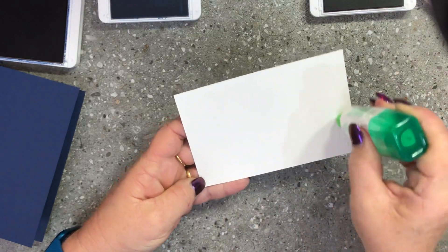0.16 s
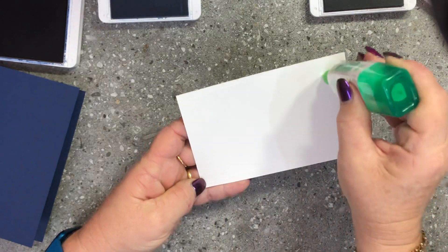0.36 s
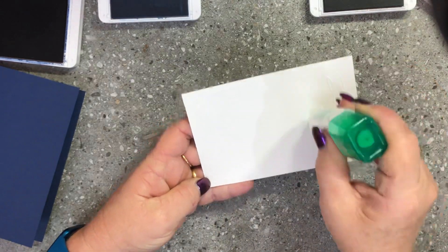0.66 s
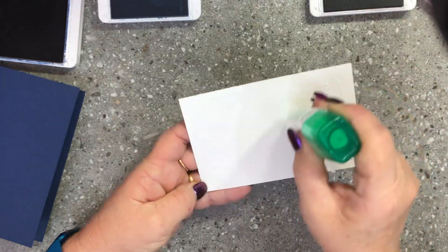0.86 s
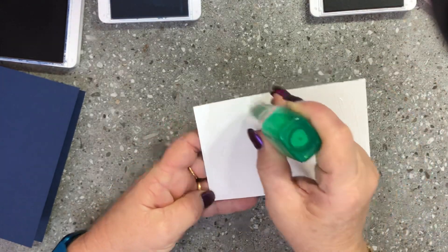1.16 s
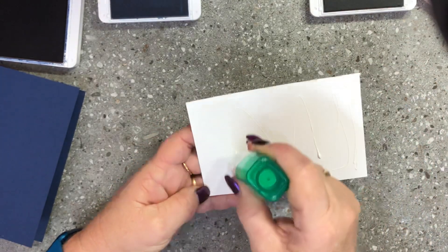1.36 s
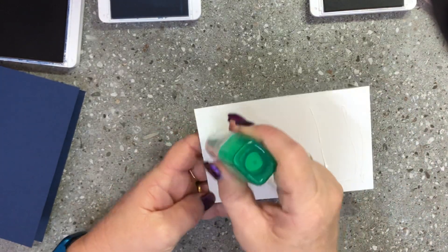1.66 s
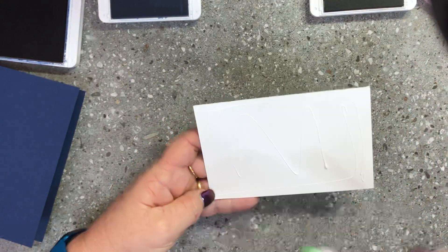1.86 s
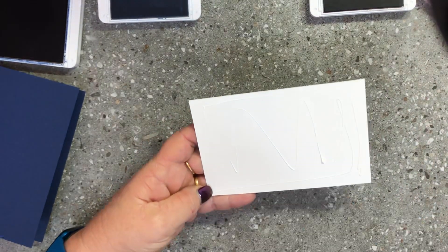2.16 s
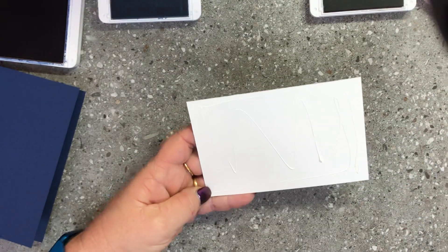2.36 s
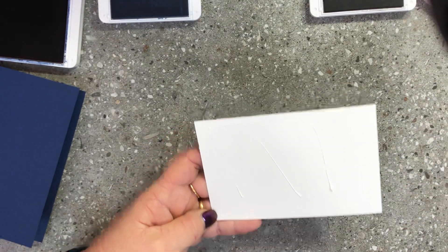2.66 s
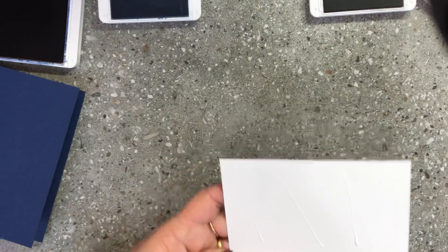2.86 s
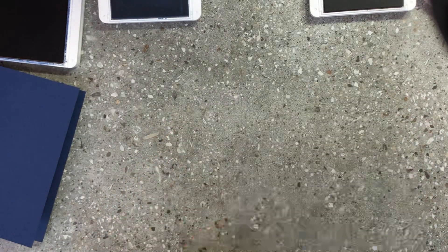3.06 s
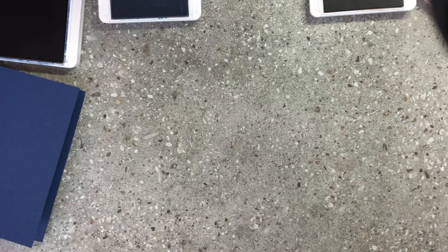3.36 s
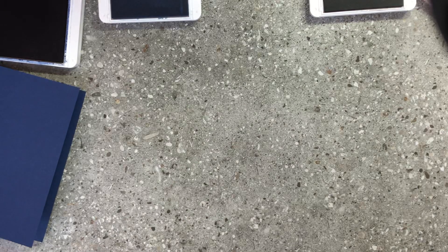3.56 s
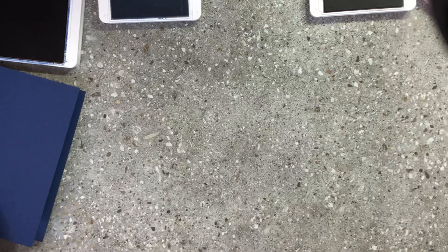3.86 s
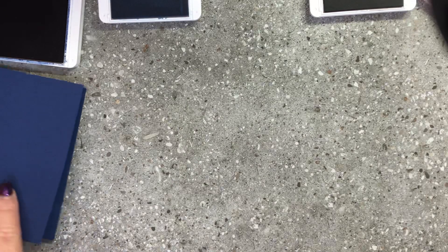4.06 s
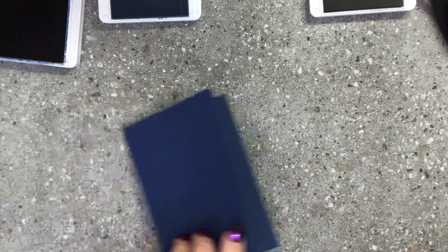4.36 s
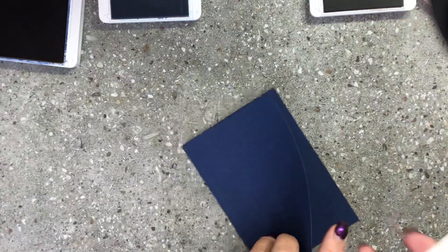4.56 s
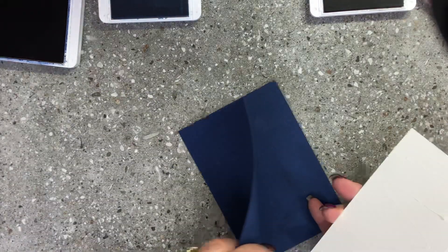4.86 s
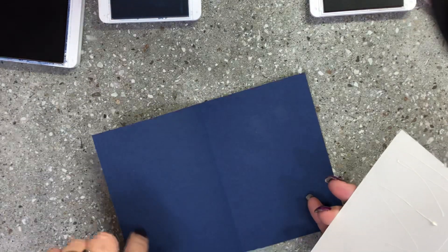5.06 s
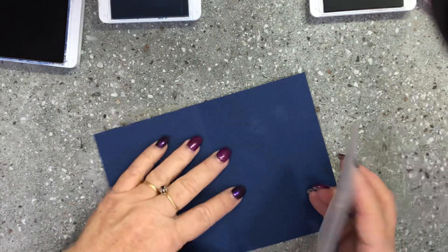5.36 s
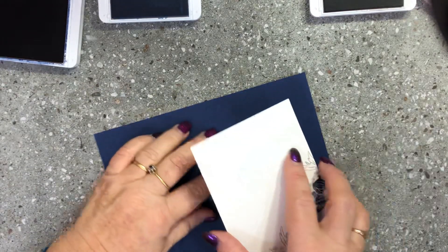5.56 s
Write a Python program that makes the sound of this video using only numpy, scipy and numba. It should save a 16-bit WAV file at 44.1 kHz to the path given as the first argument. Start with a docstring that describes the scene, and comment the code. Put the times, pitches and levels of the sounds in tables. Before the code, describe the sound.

Close dry zips of adhesive over stiff card, a hollow plastic set-down, a pause, then papery sliding, a sharp card snap and smoothing rubs.

```python
"""A tape runner lays adhesive on a hand-held card in short strokes, clicks, and is put down on a craft table.
A folded card is then slid across the table, flipped open with a snap and smoothed flat.
Strokes and rubs are dense random grains shaped by speed; snaps, clicks and the landing are struck pulses.
One close microphone above the table, in a small quiet room with low air noise."""
import sys
import numpy as np
from scipy import signal
from scipy.fft import rfft, irfft
from scipy.io import wavfile
from scipy.ndimage import uniform_filter1d
from numba import njit

SR = 44100
rng = np.random.default_rng(int(sys.argv[2]) if len(sys.argv) > 2 else 0)


def master(y):
    """Save y as 16-bit WAV."""
    cut = np.clip(np.atleast_2d(y).T, -1, 1)
    pcm = np.round(cut * 32767)  # scale
    wavfile.write(sys.argv[1], SR, pcm.astype(np.int16))


N = 251678
TIME = np.arange(N) / SR  # s

# strokes of the runner, levels relative: (middle [s], length [s], drumming of the card [dB],
# rasp of the tape [dB], fizz of the peeling adhesive [dB], card resonance at the middle [Hz])
STROKE_TABLE = [(.0, 0.24, -71, -62.5, -69, 1780), (0.258, 0.26, -57, -59.5, -60, 1640),
                (0.464, 0.14, -59.5, -64, -64.5, 1460), (0.958, .2, -60.5, -61, -83, 1560),
                (1.154, 0.25, -55, -59, -65.5, 1600), (1.379, .19, -55.5, -61.5, -70, 1264),
                (1.552, .17, -53, -67, -59.5, 1240), (1.717, 0.071, -65, -68.5, -61, 1560)]
# bright crack of a card edge, also the crackle of rubbed card: (frequency [Hz], relative level [dB])
EDGE_COLOUR = [(100, -47), (800, -20), (2500, 3.5), (4000, 7), (5500, 5.5), (8000, -1.5), (11000, -8.5),
               (16000, -3)]


def undb(db):
    """Decibels to gain."""
    return 10 ** (np.asarray(db) / 20)


def unit(x):
    """Scale to rms 1."""
    return x / np.sqrt(np.mean(x ** 2))


def through(x, response):
    """Pass a sound through an impulse response."""
    return signal.fftconvolve(x, response)[:len(x)]


def body(colour, size=4096):
    """Minimum-phase impulse response whose spectrum follows (Hz, dB) points."""
    hz, db = np.transpose(colour)
    bins = np.maximum(np.arange(size // 2 + 1) * SR / size, 1)
    level_db = np.interp(np.log(bins), np.log(hz), db)
    cepstrum = irfft(np.log(undb(level_db)))
    # folding the cepstrum forward makes the response causal
    cepstrum[1:size // 2] *= 2
    cepstrum[size // 2 + 1:] = 0
    return irfft(np.exp(rfft(cepstrum)))


def fade(t, t60):
    """Exponential decay, 60 dB down at t60 seconds."""
    return np.exp(-np.log(1000) * t / t60)


def walk(rate):
    """Random wander in straight segments, rate knots per second, with a spread near 1."""
    knots = rng.standard_normal(8192)
    return 1.2 * np.interp(TIME * rate, np.arange(len(knots)), knots)


def grains(rate, spread_db):
    """Tiny releases at random moments, rate per second, mostly weak and now and then strong; rms 1."""
    hits = rng.random(N) < rate / SR
    strength = np.minimum(rng.exponential(size=N), 5)
    sign = rng.choice([-1, 1], N)
    return unit(hits * sign * undb(spread_db * strength))


def blows(times, db):
    """One impulse for each event."""
    out = np.zeros(N)
    index = np.clip(np.round(times * SR).astype(int), 0, N - 1)
    np.add.at(out, index, undb(db))
    return out


def flutter(impulses, db, t60):
    """Dense rattling that dies away after each impulse; db is its energy against the impulse."""
    power = fade(TIME[:SR // 2], t60) ** 2
    envelope = np.sqrt(np.abs(through(impulses ** 2, power / power.sum())))
    return undb(db) * envelope * rng.standard_normal(N)


def knock(times, db, colour, flutter_db, flutter_t60, tail_db, tail_t60):
    """Contact pulses of peak level db; a thin wall flutters briefly after each and leaves a faint tail."""
    impulses = blows(times, db)
    pulse = body(colour)
    rattle = flutter(impulses, flutter_db, flutter_t60)
    tail = flutter(impulses, tail_db, tail_t60)
    return through(impulses + rattle + tail, pulse / np.abs(pulse).max())


@njit
def resonance(x, hz, width):
    """State-variable band-pass with a moving centre, gain 1 at the centre; hz and width in Hz."""
    y, band, low = np.empty(len(x)), 0., 0.
    for i in range(len(x)):
        g, k = np.tan(np.pi * hz[i] / SR), width / hz[i]
        v = (band + g * (x[i] - low)) / (1 + g * (g + k))
        band, low, y[i] = 2 * v - band, low + 2 * g * v, k * v
    return y


def moving_echo(x, delay, sway, db):
    """The bounce between card and table wanders in length as the hands move, so the colour shifts."""
    lag = delay * np.exp(sway * walk(5))  # s
    bounce = np.interp(TIME - lag, TIME, x)
    return (x + undb(db) * bounce) / np.hypot(1, undb(db))


def bending(x, delay, fast_hz=6000):
    """Bending waves travel as the root of frequency: lows lag behind fast_hz, so a snap falls in pitch."""
    hz = np.arange(N + 1) * SR / (2 * N)
    phase = 2 * np.pi * delay * (2 * np.sqrt(hz * fast_hz) - hz)
    return irfft(rfft(x, 2 * N) * np.exp(-1j * phase))[:N]


def room_tone():
    """Steady low air noise with a faint hiss, its level wandering very slightly."""
    # air noise of the room: (frequency [Hz], relative level per Hz [dB])
    air_colour = [(15, -39), (25, -4), (82, -2), (206, -0.5), (249, -4.5), (363, -7.5), (451, -9),
                  (591, -10.5), (695, -11.5), (936, -14.5), (1260, -15.5), (1400, -18.5), (6920, -25),
                  (7920, -27), (16000, -29.5)]
    air = unit(through(rng.standard_normal(N), body(air_colour, size=16384)))
    return air * undb(-67.97 + 0.097 * walk(4.6))


def room(x):
    """A few close echoes, then a short diffuse tail whose treble dies sooner."""
    # early echoes off the table and nearby things: (delay [s], level before softening [dB])
    echoes = [(.0014, -28), (.0026, -19), (.0042, -23), (.0098, -18)]
    t = TIME[:SR // 2]
    early = blows(*np.transpose(echoes))[:len(t)]
    early = signal.sosfilt(signal.butter(1, 4500, fs=SR, output="sos"), early)
    noise = rng.standard_normal(len(t))
    low = signal.sosfilt(signal.butter(2, 3500, fs=SR, output="sos"), noise)
    high = noise - low
    tail = low * fade(t, 0.31) + undb(2.5) * high * fade(t, 0.13)
    tail *= np.minimum(t / 0.018, 1)  # the tail builds up over 18 ms
    return x + through(x, early + undb(-41) * tail)


def desk(x):
    """Sound close to the table also stirs narrow resonances of its surface and the things standing on it."""
    # resonances: (frequency [Hz], width [Hz], level [dB])
    desk_modes = [(557, 114, -7.5), (800, 80, -8.5), (875, 23, -1), (1003, 31, 0.5), (1312, 71, -1),
                  (1626, 64, -7.5), (1720, 55, -4), (1930, 23, -5.5), (2123, 87, -8.5), (2633, 43, -9),
                  (3130, 230, -10), (3582, 23, -1), (4030, 21, -0.5), (4410, 13, -3), (5880, 22, -5)]
    ringing = sum(undb(db) * signal.lfilter(*signal.iirpeak(hz, hz / width, fs=SR), x)
                  for hz, width, db in desk_modes)
    return x + ringing


def landing():
    """The runner lands and rocks: its hollow plastic case clacks and rattles; the table top booms under it."""
    # contacts with the table: (time [s], relative case level [dB], table level [dB])
    contacts = [(2.7080, -16.5, -30.5), (2.7102, -25.5, -23.5), (2.7187, -36, -43), (2.7325, -32, -60),
                (2.756, -41, -47)]
    # modes of the table top: (frequency [Hz], relative level [dB], t60 [s])
    table_modes = [(148.2, -28, 0.62), (201, -15.5, .32), (226, -17.5, .3), (275, -13.5, 0.31),
                   (313.4, -5.5, .31), (402, -15, 0.11), (433.5, -7.5, 0.15), (478, -19, .2),
                   (582, -11.5, 0.13), (722, -20, .12), (806, -26, .12), (878, -13.5, .17)]
    # plastic case of the runner: (frequency [Hz], relative level [dB])
    case_colour = [(25, -59), (110, -45), (180, -12.5), (330, 11), (520, 0.5), (1000, -7.5), (1700, -2),
                   (2200, -0.5), (2900, -4), (3700, -8), (4400, -17.5), (8000, -23), (11000, -32.5),
                   (16000, -34.5)]
    s, case_db, table_db = np.transpose(contacts)
    t = TIME[:SR // 2]
    top = sum(undb(db) * np.sin(2 * np.pi * hz * t) * fade(t, t60) for hz, db, t60 in table_modes)
    # a thin board radiates little below its first mode
    top = signal.sosfilt(signal.butter(4, 150, "high", fs=SR, output="sos"), top)
    boom = through(blows(s, table_db), top)
    clack = knock(s, case_db, case_colour, flutter_db=5.5, flutter_t60=0.026, tail_db=-1.5, tail_t60=0.44)
    return clack, boom


def small_clicks():
    """Light hard contacts of plastic and fingernails: a brief plastic ring under a bright tick."""
    # clicks: (time [s], relative ring level [dB], relative tick level [dB])
    clicks = [(1.575, -62, -44), (1.7680, -67, -48), (1.783, -62, -35.5), (1.8017, -68, -40.5),
              (1.8208, -53.5, -46), (2.134, -76, -51), (2.188, -60, -77), (2.379, -46, -56),
              (2.3912, -50, -58), (2.4555, -43, -42.5), (2.6062, -45, -50), (3.6447, -45.5, -58),
              (4.054, -54, -42.5), (4.078, -47.5, -51), (4.1114, -43.5, -43)]
    # plastic ring: (frequency [Hz], relative level [dB])
    ring_colour = [(40, -45), (300, 2), (1000, -18.5), (1700, -5), (2500, -9), (3100, -2), (3700, 7),
                   (4500, -4), (8000, -25.5), (16000, -34)]
    # bright tick: (frequency [Hz], relative level [dB])
    tick_colour = [(200, -53), (2000, -14), (4500, 1), (7000, 6), (10000, -6), (16000, 3)]
    s, ring_db, tick_db = np.transpose(clicks)
    ring = knock(s, ring_db, ring_colour, flutter_db=4.5, flutter_t60=0.018, tail_db=-4.5, tail_t60=.15)
    tick = knock(s, tick_db, tick_colour, flutter_db=7.5, flutter_t60=.008, tail_db=-3, tail_t60=0.089)
    return ring + tick


def card_snaps():
    """The stiff sheet pops as a whole, its edge gives a short crack, and its slowest bend adds a soft thud."""
    # the card snaps, buckles and slaps down, levels relative:
    # (time [s], body pop [dB], edge crack [dB], low thud [dB])
    snaps = [(1.497, -44.5, -58, -54.5), (1.571, -51, -43.5, -51), (1.989, -30, -28.5, -36),
             (2.0019, -33.5, -40, -52), (3.526, -52.5, -55, -59), (4.318, -28.5, -42, -54.5),
             (4.744, -27.5, -40, -48), (4.7475, -22.5, -36, -36.5), (4.7879, -28, -46, -41.5),
             (4.8003, -37, -60, -57), (4.8770, -41, -27, -48.5), (5.0660, -10.5, -28, -18.5),
             (5.1004, -24.5, -23.5, -40), (5.1140, -36, -33, -37), (5.1863, -28.5, -30.5, -46),
             (5.2155, -32.5, -38, -55), (5.2870, -40, -35, -47.5), (5.298, -39, -58, -42),
             (5.371, -42, -34, -56), (5.655, -45, -58, -48)]
    # pop of the whole sheet: (frequency [Hz], relative level [dB])
    pop_colour = [(30, -62), (100, -50), (290, -19.5), (430, -4), (620, -7.5), (820, -6.5), (1300, 3.5),
                  (1700, 7), (2200, 3), (3200, -6), (4100, -12), (5500, -29), (16000, -77)]
    # low thud: (frequency [Hz], relative level [dB])
    thud_colour = [(30, -42), (120, -13), (220, -10.5), (320, -1), (520, 5.5), (800, 5), (1500, -26.5),
                   (6000, -79)]
    s, pop_db, crack_db, thud_db = np.transpose(snaps)
    pop = knock(s, pop_db, pop_colour, flutter_db=1.0, flutter_t60=0.023, tail_db=-10.0, tail_t60=0.57)
    crack = knock(s, crack_db, EDGE_COLOUR, flutter_db=8.0, flutter_t60=0.0085, tail_db=-1.5, tail_t60=0.43)
    thud = knock(s, thud_db + 0.5, thud_colour, flutter_db=-6, flutter_t60=0.084, tail_db=-7.5, tail_t60=0.24)
    return crack + bending(pop + thud, delay=0.000796)


def hold_gains():
    """Hiss, grain and drumming of fingers that shift faintly and at random on the held card."""
    held = 1. * (TIME > 0.86) * (TIME < 3.1)
    held = uniform_filter1d(held, size=2000)  # 45 ms ramps
    levels = undb([-86, -84, -91])  # hiss, grain, drumming
    return np.outer(levels, held * undb(3 * walk(31)))


def rub_gains():
    """Hiss, grain and drumming of the short rubs: each swells to its fastest moment and dies away."""
    # rubs of card on table, card or skin, levels relative:
    # (fastest at [s], rise [s], fall [s], hiss [dB], fine grain [dB], drumming of the sheet [dB])
    rubs = [(1.785, 0.0048, 0.028, -72, -54, -56.5), (2.03, 0.029, 0.025, -78, -71, -57),
            (2.32, .08, 0.083, -70, -80, -77), (2.384, 0.0095, 0.048, -60.5, -87, -70),
            (3.001, 0.099, 0.049, -68.5, -73.5, -70), (3.245, 0.0055, 0.071, -68.5, -90, -67),
            (3.552, 0.016, .028, -58, -58.5, -53), (3.648, 0.016, 0.026, -74, -88, -59.5),
            (3.766, 0.028, 0.025, -65, -77, -63.5), (3.983, 0.011, 0.019, -67, -71, -67.5),
            (4.085, 0.011, 0.083, -61.5, -60.5, -54), (4.32, 0.024, 0.019, -52, -63, -51),
            (4.615, .025, 0.071, -51.5, -73, -50.5), (4.75, 0.019, 0.09, -59.5, -68, -44.5),
            (4.867, 0.039, 0.019, -37, -46.5, -57), (4.977, 0.018, 0.049, -45.5, -42, -52),
            (5.11, 0.12, 0.064, -62, -57.5, -49), (5.189, 0.016, 0.014, -46.5, -73, -42.5),
            (5.275, 0.076, 0.11, -55, -58, -50.5), (5.372, 0.023, 0.048, -48.5, -52.5, -58),
            (5.588, 0.059, 0.065, -57, -57, -59), (5.662, 0.022, 0.036, -68, -63, -56)]
    rise_shape, fall_shape = 1.82, 1.01  # 1 = exponential, 2 = bell
    power = np.zeros((3, N))
    for s, rise, fall, *db in rubs:
        near = np.abs(TIME - s) < .5
        t = TIME[near] - s
        rising = np.abs(t / rise) ** rise_shape
        falling = np.abs(t / fall) ** fall_shape
        swell = np.exp(-np.where(t < 0, rising, falling))
        power[:, near] += np.outer(undb(db), swell) ** 2
    return np.sqrt(power)


def pull_gains():
    """Hiss, grain and drumming as the folded card is pulled over the table, all driven by its speed."""
    # loudness of the pull, following its speed: (time [s], relative level [dB])
    pull = [(4.135, -57.5), (4.175, -43), (4.253, -42.5), (4.307, -35.5), (4.357, -41), (4.415, -38.5),
            (4.521, -49), (4.559, -42.5), (4.609, -44), (4.705, -71)]
    s, db = np.transpose(pull)
    level = undb(np.interp(TIME, s, db)) * (TIME > s[0]) * (TIME < s[-1])
    level = uniform_filter1d(level, size=300)  # smoothed over 7 ms
    speed = np.abs(level) / level.max()
    drum = undb(-51.5) * speed ** 0.28  # drumming grows only slowly with speed
    return np.array([level * undb(-2.5), level * undb(-6), drum])


def sliding():
    """Paper fibres catch on the table: a hiss, a finer grain on top, the sheet drumming along, and crackle."""
    # hiss of rubbed card: (frequency [Hz], relative level [dB])
    hiss_colour = [(40, -51), (300, -29), (1000, -42.5), (1900, 1), (2800, 3.5), (4000, 3), (5500, 1),
                   (7800, -9), (9500, -9.5), (16000, -21)]
    # fine grain: (frequency [Hz], relative level [dB])
    fine_colour = [(500, -57), (3000, -27), (6000, 4), (8000, 5), (10000, 0), (13000, -1), (16000, -2.5)]
    # drumming of the sheet: (frequency [Hz], relative level [dB])
    sheet_colour = [(40, -18), (150, -20), (400, -3.5), (600, -9), (920, -7.5), (1100, -4.5), (1500, -1.5),
                    (1950, -2.5), (2400, -4), (3200, -17), (6000, -45)]
    # pull, rubs and held card add in power
    hiss, fine, drum = np.sqrt(pull_gains() ** 2 + rub_gains() ** 2 + hold_gains() ** 2)
    pressure = undb(1.48 * walk(70))
    layers = [(hiss * undb(0.5), hiss_colour, grains(rate=11000, spread_db=1.0)),
              (fine * undb(3.5), fine_colour, grains(rate=23000, spread_db=3.5)),
              (drum * undb(-2.5), sheet_colour, grains(rate=4000, spread_db=1.0)),
              (hiss * undb(-13.5), EDGE_COLOUR, grains(rate=310, spread_db=2.0))]  # scattered crackle
    rub = sum(gain * unit(through(fibres, body(colour))) for gain, colour, fibres in layers)
    return pressure * moving_echo(rub, delay=0.001067, sway=0.237, db=-6.5)


def stroke_speed(lead=0):
    """Relative speed of the roller, 0 to 1: each stroke gathers speed, holds it and slows, lead seconds early."""
    middle, length = np.transpose(STROKE_TABLE)[:2, :, None]
    flatness = 2.18  # 2 = a parabola, more = a longer even middle
    from_middle = np.minimum(2 * np.abs(TIME + lead - middle) / length, 1)
    return 1 - from_middle ** flatness


def stroke_controls():
    """Gains of drumming, rasp and fizz, each a power of speed, and the card's resonance in Hz."""
    middle, length, roll_db, rasp_db, fizz_db, hz = np.transpose(STROKE_TABLE)
    speed = stroke_speed()
    early = stroke_speed(lead=0.01)  # the rasp runs 10 ms ahead
    roll = undb(roll_db) @ speed ** 2.23
    rasp = undb(rasp_db) @ early ** 2.4
    fizz = undb(fizz_db) @ speed ** 2.3
    nearest = np.searchsorted((middle[1:] + middle[:-1]) / 2, TIME)
    half = length[nearest] / 2
    travel = np.clip(TIME - middle[nearest], -half, half)
    card_hz = hz[nearest] - 560 * travel  # sinks 560 Hz per second as the roller travels
    return roll, rasp, fizz, card_hz


def roller():
    """Adhesive lets go of its tape in tiny threads; they drum the card, rasp and fizz at an uneven level."""
    # the roller catches and skids: (start [s], length [s], relative level [dB])
    skids = [(0.684, 0.014, -54), (0.699, 0.014, -49.5), (.734, 0.0042, -51), (0.738, 0.012, -53.5),
             (0.754, 0.018, -54), (0.783, 0.011, -58.5), (0.792, 0.021, -66.5), (1.723, 0.0097, -53)]
    # card driven by the roller: (frequency [Hz], relative level [dB])
    roll_colour = [(60, -40), (250, -16), (500, -5.5), (750, 0), (1400, -1.5), (1950, -1.5), (2400, -15),
                   (3000, -23), (6000, -17), (16000, -46.5)]
    # rasp of the tape: (frequency [Hz], relative level [dB])
    rasp_colour = [(600, -22), (1700, 6.5), (2200, 1.5), (2600, 5.5), (3000, -3.5), (3550, 5), (4000, -2),
                   (4600, -3), (6000, -11.5), (9000, -15), (16000, -41)]
    # fizz of the peeling adhesive: (frequency [Hz], relative level [dB])
    fizz_colour = [(500, -30), (3000, -4.5), (4800, 0), (6200, -5.5), (7700, 2), (9000, -4.5), (10000, -7),
                   (16000, -15)]
    roll, rasp, fizz, card_hz = stroke_controls()
    skid = sum(undb(db) * ((TIME > s) & (TIME < s + length)) for s, length, db in skids)
    skid = uniform_filter1d(skid, size=90)  # 2 ms ramps
    drum = through(grains(rate=5000, spread_db=2.1), body(roll_colour))
    drum = unit(.5 * drum + resonance(drum, card_hz, 1100.))
    tape = unit(through(grains(rate=8000, spread_db=3.0), body(rasp_colour)))
    peel = unit(through(grains(rate=9000, spread_db=3.0), body(fizz_colour)))
    stroke = drum * (roll + skid * undb(-4))
    stroke += tape * (rasp + skid * undb(-2.0))
    stroke += peel * (fizz + skid * undb(-8.5))
    unevenness = undb(-0.73 + 1.35 * walk(110))
    return moving_echo(stroke, delay=0.00086, sway=0.25, db=-8.5) * unevenness


def scene():
    """Everything reaches one close microphone, the same in both channels."""
    case, boom = landing()
    near = roller() + sliding() + card_snaps() + small_clicks() + case
    mono = undb(-1.5) * room(desk(near)) + boom + room_tone()
    return np.array([mono, mono])


def record(dry):
    """The recorder drops the deepest rumble below 42 Hz and cuts the top steeply at 15.9 kHz."""
    dry = signal.sosfilt(signal.butter(5, 42, "high", fs=SR, output="sos"), dry)
    return signal.sosfilt(signal.ellip(10, .2, 70, 15900, fs=SR, output="sos"), dry)


dry = scene()
out = record(dry)
master(out)
```